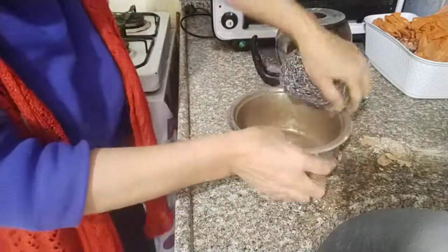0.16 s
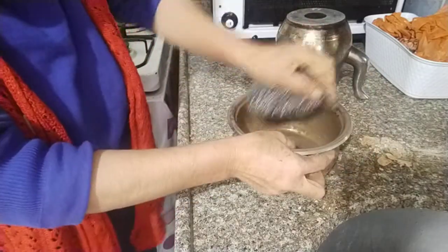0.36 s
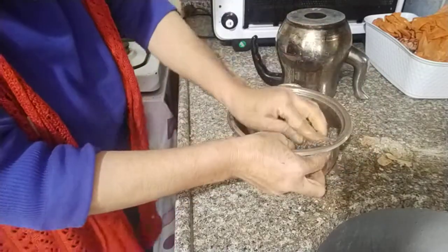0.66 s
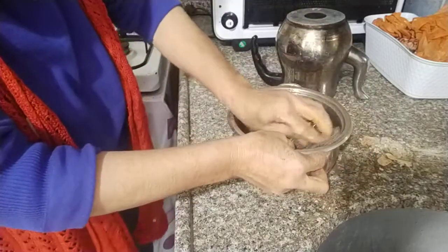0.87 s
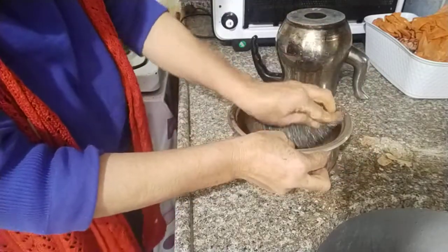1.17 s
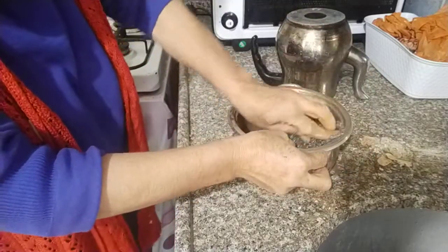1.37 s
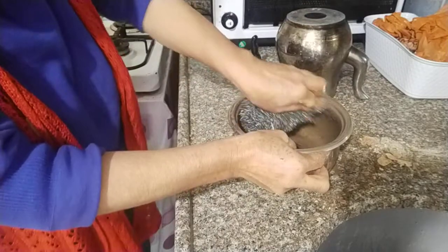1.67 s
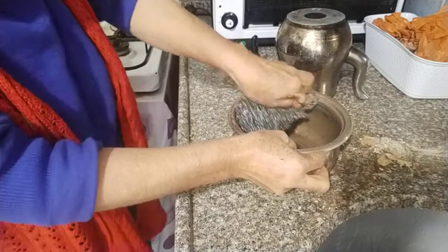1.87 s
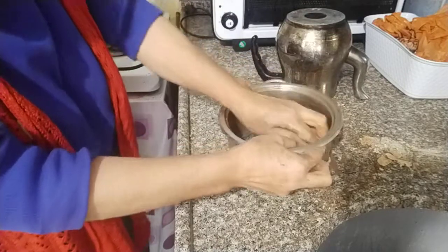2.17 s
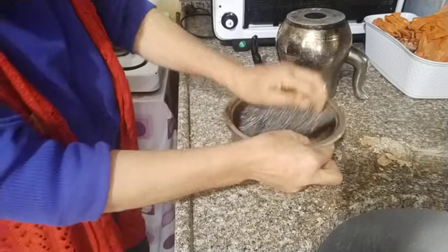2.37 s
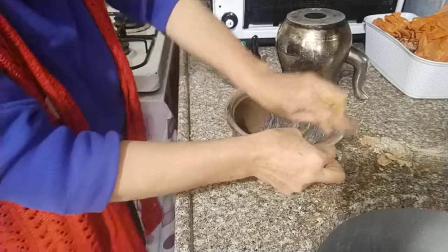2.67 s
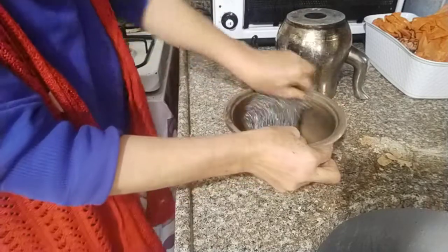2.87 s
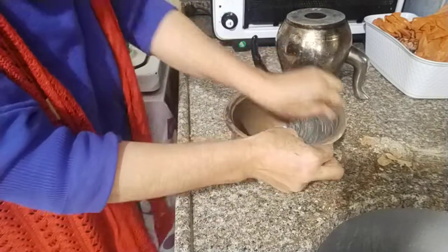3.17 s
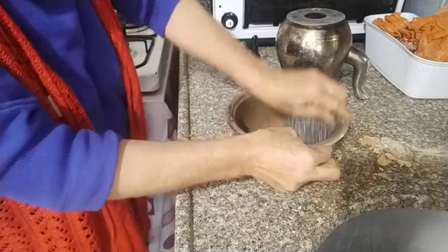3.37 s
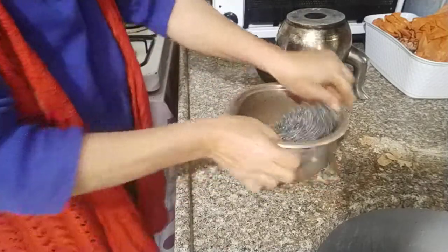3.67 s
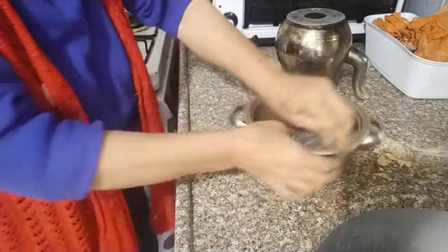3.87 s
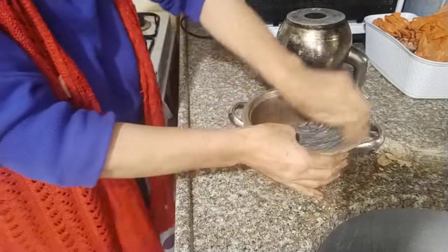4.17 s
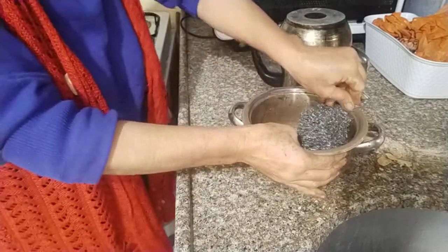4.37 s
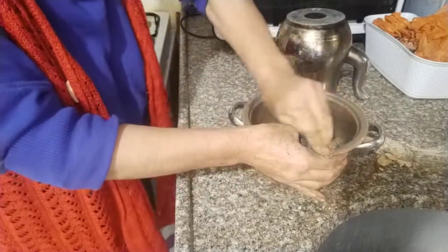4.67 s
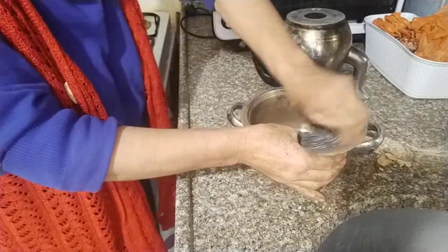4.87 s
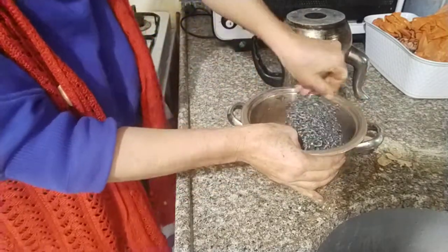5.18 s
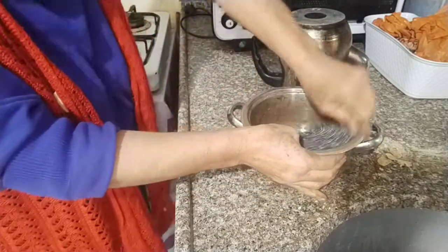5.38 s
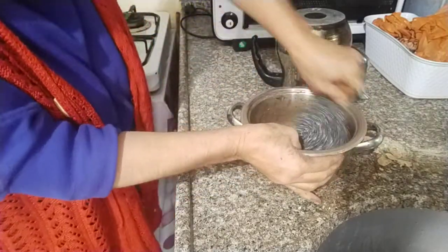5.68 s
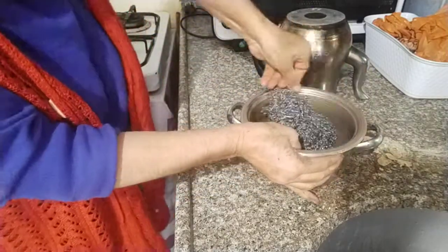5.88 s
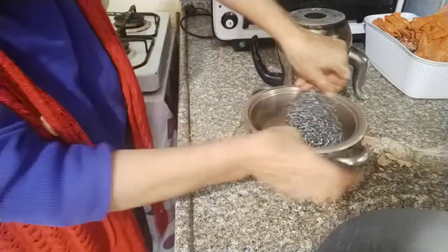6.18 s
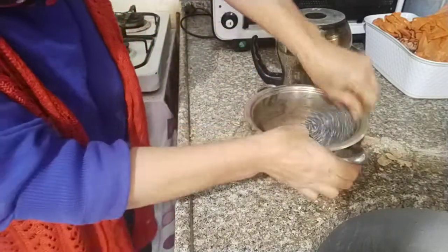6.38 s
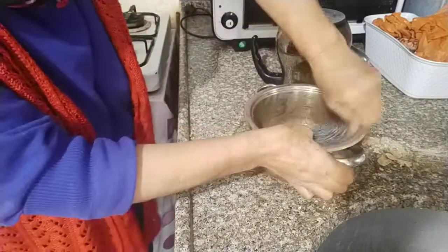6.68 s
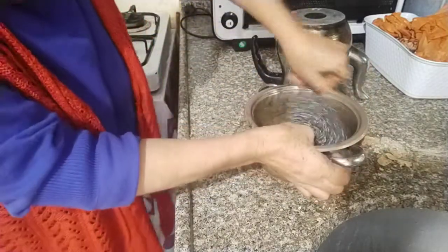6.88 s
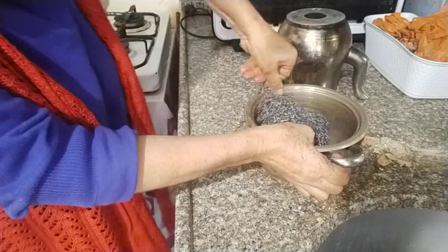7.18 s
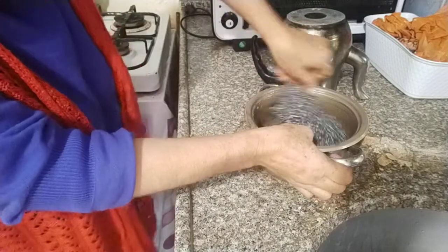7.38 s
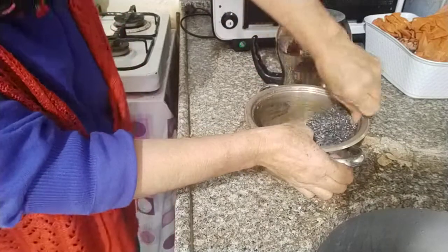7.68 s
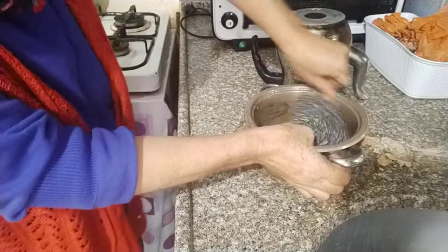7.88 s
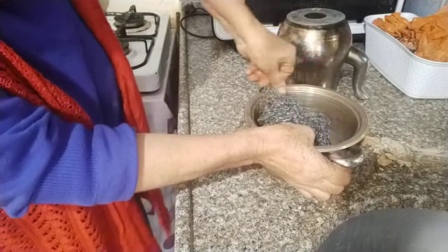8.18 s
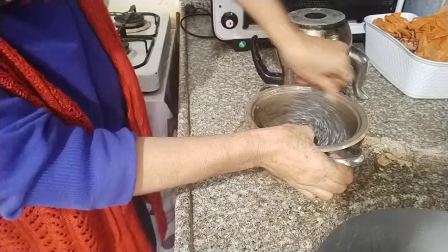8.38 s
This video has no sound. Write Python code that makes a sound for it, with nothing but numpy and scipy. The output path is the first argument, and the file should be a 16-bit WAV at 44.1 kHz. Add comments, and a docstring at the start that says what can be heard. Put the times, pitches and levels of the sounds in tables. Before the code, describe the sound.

A ball of steel wire scours a small steel pot in a home kitchen. Each stroke is a bright, scratchy hiss with a faint hollow rasp beneath, about two or three a second. The pot clanks and thuds irregularly on the stone counter, and snagged wire snaps free. Near the middle the pot is dragged round with a grinding, ringing scrape, then the scrubbing carries on. It sounds close, with a short echo.

```python
"""Small kitchen, granite counter: a steel-wire ball scours a small, ash-smeared steel pot.
Each stroke is a hiss of tiny wire slips that also drive the pot's wall, base and hollow.
Now and then the pot rocks and knocks on the stone, or is dragged and turned on its base.
Wires snag and snap free; friction briefly makes single modes sing. Short echo, faint room noise."""
import sys
import numpy as np
from scipy import signal
from scipy.io import wavfile
from scipy.ndimage import uniform_filter1d

SR = 44100
rng = np.random.default_rng(int(sys.argv[2]) if len(sys.argv) > 2 else 0)


def master_out(mix):
    """Clip the mix to full scale and print it as 16-bit PCM to the path in sys.argv[1]."""
    frames = np.transpose(np.atleast_2d(mix))
    ceiling = np.clip(frames, -1, 1)
    pcm = np.round(ceiling * 32767).astype(np.int16)
    wavfile.write(sys.argv[1], SR, pcm)


N = 376173
TIME = np.arange(N) / SR

# Table levels are relative, ahead of the layer gains.
# scourer strokes: t/s, length/s, rise/s, fall/s, hiss/dB, hiss slant start to end/dB,
# wall rasp/dB, low scrub/dB, base tone/Hz
STROKES = [(0.0, 0.34, 0.005, 0.09, -42.5, -4, -46.0, -49, 890),
           (0.247, 0.27, 0.068, 0.043, -63, 9, -66, -60, 855),
           (0.573, 0.14, 0.089, 0.07, -44.5, 5, -54, -56.5, 790),
           (0.718, 0.21, 0.029, 0.055, -51, 5, -58.5, -56.5, 885),
           (0.862, 0.33, 0.059, 0.085, -38.5, 12, -48, -51.5, 900.0),
           (1.154, 0.32, 0.15, 0.14, -38.5, 17, -50.5, -52.5, 980),
           (1.458, 0.42, 0.092, 0.09, -38, -0.5, -47, -53.5, 890),
           (1.87, 0.27, 0.13, 0.09, -39.5, -15, -48.5, -57, 834),
           (2.05, 0.29, 0.1, 0.077, -37.5, -22, -50.0, -45.5, 960),
           (2.26, 0.21, 0.056, 0.15, -49, -7, -53, -48.5, 680),
           (2.511, 0.18, 0.069, 0.11, -42, 6, -44.5, -46.5, 880),
           (2.606, 0.47, 0.092, 0.155, -36.5, 10, -42.5, -50, 835),
           (2.993, 0.38, 0.12, 0.085, -35.5, 4, -43.5, -48.5, 925),
           (3.363, 0.36, 0.077, 0.18, -36, 5, -44.0, -47, 870),
           (3.588, 0.5, 0.2, 0.12, -38.0, -6, -44.5, -42, 790),
           (4.06, 0.39, 0.17, 0.082, -35, -2, -45.5, -50.5, 950),
           (4.438, 0.38, 0.048, 0.12, -35.5, 2.5, -44.5, -52, 1360),
           (4.758, 0.48, 0.13, 0.054, -36, -3.5, -45, -48.5, 870),
           (5.218, 0.33, 0.047, 0.15, -35.0, 10, -46, -52, 750),
           (5.485, 0.52, 0.24, 0.094, -35, -9, -45, -50.5, 1440),
           (5.948, 0.31, 0.063, 0.089, -43.5, 12.0, -51.0, -49.5, 730.0),
           (6.238, 0.4, 0.095, 0.13, -34.5, 17.5, -43, -49, 830),
           (6.632, 0.62, 0.11, 0.1, -36.5, -13, -44, -52, 880),
           (7.18, 0.5, 0.15, 0.058, -37, 12.5, -46.5, -52.5, 965),
           (7.748, 0.48, 0.1, 0.045, -36.0, -6.5, -44.5, -53, 1270),
           (8.22, 0.398, 0.12, 0.11, -34, 12.5, -45, -53, 1360)]
# pot rocking, wire snagging: t/s, clack/dB, base tone/Hz, thud/dB, snap/dB
KNOCKS = [(0.028, -28.5, 864, -36.5, -31.5), (0.093, -32.5, 1650, -46, -33),
          (0.167, -30, 1030, -39.5, -27.5), (0.424, -45, 654, -46.5, -62), (0.696, -44, 1710, -71, -54),
          (1.001, -43, 824, -52.5, -46), (1.515, -69, 945, -55, -45), (2.08, -30.5, 613, -45, -60),
          (2.136, -47, 802, -49, -30.5), (2.156, -38, 820, -53, -26.5), (2.168, -52, 810, -53, -24),
          (2.343, -41, 800, -39.5, -40), (2.602, -33.5, 920, -54, -43), (2.831, -27, 1390, -47, -21.5),
          (2.845, -25.5, 1330, -45.5, -29), (3.013, -35, 955, -41.5, -45), (3.554, -25, 1070, -44, -27.5),
          (3.734, -27, 830, -48, -22), (3.791, -31, 960, -53, -33), (3.9, -29, 1620, -48, -30),
          (4.308, -36.5, 1020, -44.5, -31.5), (4.639, -39.5, 1405, -46.5, -37),
          (4.912, -33.5, 961, -65, -27), (4.927, -32.5, 1360, -60, -28), (5.088, -29, 975, -61, -29.5),
          (5.117, -29, 944, -58, -36), (5.27, -32, 1040, -60, -35), (5.489, -54, 910, -47.5, -40),
          (5.8, -32, 630, -49, -34), (6.248, -34.5, 710, -52.5, -35), (6.359, -37, 700, -45, -42),
          (6.6, -43, 880, -49.5, -44), (6.74, -35, 1200, -67, -28.5), (6.788, -26.5, 1100, -54, -27),
          (7.483, -42, 1090, -49, -44), (7.653, -33, 1050, -52, -25.5), (7.662, -31.5, 1440, -56, -34)]
# base dragged on stone: t/s, length/s, rise/s, fall/s, grind/dB, rumble/dB, wall ring/dB
DRAGS = [(0.0, 0.31, 0.005, 0.17, -42, -47.5, -42.5), (2.14, 0.11, 0.052, 0.046, -40, -62, -58),
         (2.274, 0.21, 0.032, 0.2, -50, -48, -48), (3.21, 0.15, 0.036, 0.06, -44, -70, -56),
         (3.514, 0.23, 0.037, 0.041, -37, -43, -48.5), (3.72, 0.14, 0.033, 0.085, -33.5, -31.5, -38),
         (3.823, 0.28, 0.055, 0.17, -38, -46, -40.5), (4.13, 0.078, 0.017, 0.05, -44, -51, -44),
         (5.953, 0.57, 0.17, 0.42, -39, -47, -45), (6.56, 0.18, 0.04, 0.065, -54, -53, -55),
         (7.212, 0.099, 0.03, 0.044, -49.5, -55, -62)]
# pot modes caught by friction: centre t/s, half length/s, f/Hz, level/dB
SINGS = [(0.022, 0.035, 1623, -35.5), (0.118, .03, 1647, -41.5), (0.697, 0.0072, 3380, -49),
         (1.641, 0.1, 936, -55.5), (2.341, 0.074, 3405, -56), (3.849, 0.057, 3436, -42),
         (3.909, 0.03, 3357, -36.5)]

# wire slips: f/Hz, level/dB
WIRE_SPECTRUM = [(2500, -45), (4500, -29), (5300, -26), (6600, -21.5), (7100, -10), (7550, -7),
                 (8100, -13.5), (9700, -15.5), (10400, -12), (11300, -13.5), (12800, -10.5), (13800, -5.5),
                 (14600, -4.5), (15500, 0)]
# wire snapping free: f/Hz, level/dB
SNAP_SPECTRUM = [(1200, -56), (2800, -11), (4600, -10), (6200, -21.5), (7600, 3.5), (9000, -3.5),
                 (12000, 1), (15500, 6)]
# steel on stone: f/Hz, level/dB
CLACK_SPECTRUM = [(70, -31), (170, -4), (340, -4), (460, -9), (620, -1), (800, 4), (950, 0), (1100, -0.5),
                  (1200, -2.5), (1400, -4), (1700, -11), (2100, -12.5), (4000, -25), (7000, -26)]
# counter under a bump: f/Hz, level/dB
THUD_SPECTRUM = [(35, -48), (65, -8), (88, -11), (115, -0.5), (180, -1), (260, -6.5), (340, -11),
                 (450, -12), (700, -29), (2000, -62)]
# quiet kitchen: f/Hz, level/dB
ROOM_SPECTRUM = [(20, 12.5), (50, -5), (120, -8), (170, -17), (400, -14), (700, -36), (1500, -2.5),
                 (3000, -19.5), (6000, -25), (15000, -16)]

# wall damped by hand and pad: f/Hz, width/Hz, level/dB
DAMPED_WALL_MODES = [(2167, 610, -3.5), (2858, 75, 9), (3440, 103, 5.5), (3582, 47, 6.5), (3810, 310, -2.5),
                     (4430, 29, -7.5)]
# wall ringing freely: f/Hz, width/Hz, level/dB
FREE_WALL_MODES = [(1637, 12, 0.5), (2520, 330, -10.5), (2831, 41, 0), (3380, 59, 1), (3420, 63, -2),
                   (5237, 88, -4.5), (5650, 160, -12.5), (6110, 210, -8), (7580, 30, -1.5), (8490, 120, -5),
                   (9200, 49, -10)]
# pot's hollow under the pad: f/Hz, width/Hz, level/dB
HOLLOW_MODES = [(169, 70, -3), (270, 100, -6), (420, 65, -6.5), (542, 30, 1.5), (657, 60, 3.5),
                (776, 102, 4), (936, 57, 0), (1098, 70, 2), (1318, 81, 4), (1757, 216, -2)]
# counter under the dragged base: f/Hz, width/Hz, level/dB
COUNTER_MODES = [(116, 14, 2), (164, 14, 5), (197, 18, 1.5), (225, 35, 0.5), (257.6, 8.4, 5),
                 (329, 16, 0.5)]
# kitchen echo decay: f/Hz, T60/s
ECHO_T60 = [(150, 0.41), (500, 0.62), (1500, 0.3), (4000, 0.41), (8000, 0.28), (15000, 0.23)]


def scourer():
    """Wire slips hiss, rasp on the wall and stir the pot's hollow and base."""
    hiss, rasp, scrub, base_hz = arm()
    wires = slips(rate_hz=7000, spread_db=1, clump_db=1.07, clump_s=0.008)
    ash = slips(rate_hz=3300, spread_db=1, clump_db=1.5, clump_s=0.014)
    ash = scrub * shifting_contact(ash, depth_db=1.7)
    return (amp(5.5) * through(hiss * shifting_contact(wires, depth_db=1.94), colour(WIRE_SPECTRUM))
            + amp(-3.5) * through(rasp * shifting_contact(wires, depth_db=2), modes(DAMPED_WALL_MODES))
            + amp(-5) * through(ash, modes(HOLLOW_MODES))
            + amp(-11.5) * resonate(ash, base_hz, width_hz=270))


def arm():
    """Strokes set hiss, rasp and scrub gains; the loaded base shifts tone as the pad travels."""
    rasp_db_per_db, scrub_db_per_db = 0.68, 0.33  # slopes against hiss
    power = np.zeros((3, N))
    power[0] = amp(-58) ** 2 * (TIME > 1)  # once pressed in, wire rustles between strokes
    for start_s, length_s, rise_s, fall_s, hiss_db, slant_db, rasp_db, scrub_db, _ in STROKES:
        push = slide(start_s, length_s, rise_s, fall_s, slant_db)
        power += np.square([amp(hiss_db) * push,
                            amp(rasp_db) * push ** rasp_db_per_db,
                            amp(scrub_db) * push ** scrub_db_per_db])
    start_s, length_s, *_, tone_hz = np.transpose(STROKES)
    drift = np.exp(0.07 * wander(step_s=0.06))
    base_hz = np.interp(TIME, start_s + length_s / 2, tone_hz) * drift
    uneven_hand = amp(1.5 * wander(step_s=0.021))
    hiss, rasp, scrub = np.sqrt(power) * uneven_hand
    return hiss, rasp, scrub, base_hz


def slide(start_s, length_s, rise_s, fall_s, slant_db=0):
    """Gain of a slide that speeds up, runs on and stops."""
    t = TIME - start_s
    speed = np.clip(t / rise_s, 0, 1) * np.clip((length_s - t) / fall_s, 0, 1)
    progress = np.clip(t / length_s, 0, 1)
    return speed ** 1.414 * amp(slant_db * (progress - 0.5))


def slips(rate_hz, spread_db, clump_db, clump_s):
    """Uneven stick-slip kicks in clumps; unit power."""
    size = amp(spread_db * np.clip(rng.standard_normal(N), -2.5, 2.5) + clump_db * wander(clump_s))
    kicks = size * rng.choice([-1, 1], N) * (rng.random(N) < rate_hz / SR)
    return kicks / (kicks.std() + 1e-12)


def shifting_contact(force, depth_db, frame_samples=512):
    """Changing contact points shift the spectrum in patches; unit power."""
    spectra = signal.stft(force, nperseg=frame_samples)[2]
    patches = uniform_filter1d(rng.standard_normal(spectra.shape), size=3, axis=0)
    patches = uniform_filter1d(patches, size=6, axis=1)
    gain = amp(depth_db * patches / patches.std())
    out = signal.istft(spectra * gain, nperseg=frame_samples)[1][:N]
    return out / out.std()


def knocks():
    """The rocking pot clanks at a grip-set tone, thuds the counter and rings; snagged wire snaps."""
    thud, clack, snap, ring, clank = np.zeros((5, N))
    for start_s, clack_db, base_hz, thud_db, snap_db in KNOCKS:
        blow = contacts(decay_s=0.0079, first=0.43)
        add(clack, start_s, amp(clack_db) * blow)
        add(clank, start_s, amp(clack_db) * resonate(blow, base_hz, width_hz=60))
        add(ring, start_s, amp((clack_db + snap_db) / 2) * blow)
        add(thud, start_s, amp(thud_db) * contacts(decay_s=0.014, first=0.61))  # stone settles slowly
        release = contacts(decay_s=0.0083, first=0.084, rise_s=0.0019)  # wire lets go loop by loop
        add(snap, start_s, amp(snap_db) * release)
    return (amp(27.5) * through(thud, colour(THUD_SPECTRUM))
            + amp(17) * (through(clack, colour(CLACK_SPECTRUM)) + clank)
            + amp(26) * through(snap, colour(SNAP_SPECTRUM))
            + through(amp(17) * ring + amp(8.5) * snap, modes(FREE_WALL_MODES)))


def contacts(decay_s, first, rise_s=0.0007):
    """One contact of weight `first`, then dying chatter; unit energy."""
    t = TIME[:SR // 4]
    envelope = np.exp(-t / decay_s) * (1 - np.exp(-t / rise_s))
    chatter = rng.standard_normal(len(t)) * (rng.random(len(t)) < 0.2) * envelope
    force = chatter / np.linalg.norm(chatter)
    force[0] += first
    return force / np.linalg.norm(force)


def drags():
    """The base judders over the stone's grain; the counter rumbles, the wall rings."""
    grind, rumble, ring = sum(amp(row[4:])[:, None] * slide(*row[:4]) for row in DRAGS)
    high_pass = signal.butter(4, 95, "highpass", fs=SR, output="sos")
    counter = signal.sosfilt(high_pass, modes(COUNTER_MODES))  # the rumble carries no deep bass below about 95 Hz
    judder = slips(rate_hz=1400, spread_db=6, clump_db=1.5, clump_s=0.0099)
    wall_force = ring * shifting_contact(judder, depth_db=3.5, frame_samples=1024)
    return (amp(-7.5) * through(grind * judder, colour(CLACK_SPECTRUM))
            + amp(-11) * resonate(grind * judder, hz=790, width_hz=120)
            + amp(-2.5) * through(rumble * judder, counter)
            + amp(-2.5) * through(wall_force, modes(FREE_WALL_MODES)))


def singing():
    """Friction feeds one narrow mode, which swells and fades."""
    out, t = np.zeros(N), TIME[:SR // 2]
    for centre_s, half_s, hz, db in SINGS:
        start_s = max(centre_s - 2 * half_s, 0)
        envelope = np.exp(-((start_s + t - centre_s) / half_s) ** 2)
        rubbing = rng.standard_normal(len(t)) * envelope
        add(out, start_s, amp(db) * resonate(rubbing, hz, width_hz=37))
    return out


def kitchen_echo(sound, cycle_s=0.7, gap_s=0.004):
    """Tiles and cupboards reflect; moving arms vary the paths, as four crossfaded tails."""
    out, t = np.zeros(N), TIME[:SR // 2]
    for k in range(4):
        taps = rng.standard_normal(len(t)) * (rng.random(len(t)) < 0.1) * (t > gap_s)
        hz, age_s, spectra = signal.stft(taps, SR, nperseg=256)
        decay = amp(-60 * age_s / lookup(ECHO_T60, hz)[:, None])
        tail = signal.istft(spectra * decay, SR, nperseg=256)[1]
        share = np.maximum(np.cos(2 * np.pi * (TIME / cycle_s - k / 4)), 0)
        out += through(sound * share, tail)
    return out


def room_noise():
    """Faint, steady coloured noise."""
    return amp(-61.5) * through(rng.standard_normal(N), colour(ROOM_SPECTRUM))


def colour(spectrum):
    """Minimum-phase impulse response of a spectrum table."""
    hz = np.fft.rfftfreq(8192, 1 / SR)
    log_gain = np.log(amp(lookup(spectrum, hz)))
    mirrored = np.concatenate([log_gain, log_gain[-2:0:-1]])
    response = np.exp(np.conj(signal.hilbert(mirrored)))
    return np.fft.ifft(response).real[:len(hz)]


def modes(rows):
    """Impulse response of damped modes, alternating in sign."""
    t = TIME[:SR // 5]
    return sum((-1) ** k * amp(db) * width_hz * np.exp(-np.pi * width_hz * t) * np.sin(2 * np.pi * hz * t)
               for k, (hz, width_hz, db) in enumerate(rows))


def resonate(force, hz, width_hz):
    """Resonance at a steady or moving pitch; unit power gain for white noise."""
    carrier = np.exp(2j * np.pi * np.cumsum(hz * np.ones(len(force))) / SR)
    pole = np.exp(-np.pi * width_hz / SR)
    gain = np.sqrt(2 * (1 - pole ** 2))
    return (carrier * signal.lfilter([gain], [1, -pole], force / carrier)).imag


def through(force, body):
    """Force convolved with a body's response, scaled to unit energy."""
    return signal.oaconvolve(force, body / np.linalg.norm(body))[:N]


def wander(step_s):
    """Random drift between unit-variance knots."""
    knots = rng.standard_normal(N // 8)
    return np.interp(TIME / step_s, np.arange(len(knots)), knots)


def lookup(table, hz):
    """Interpolate over log frequency."""
    knots_hz, values = np.transpose(table)
    return np.interp(np.log(hz + 1), np.log(knots_hz), values)


def add(mix, start_s, sound):
    """Mix in place."""
    part = mix[round(start_s * SR):][:len(sound)]
    part += sound[:len(part)]


def amp(db):
    """dB to gain."""
    return 10 ** (np.asarray(db) / 20)


def scene():
    """Scourer, pot and kitchen; dual mono."""
    direct = scourer() + drags() + knocks() + singing()
    mono = direct + room_noise() + kitchen_echo(amp(-7) * direct)
    return np.array([mono, mono])


def record(dry, cutoff_hz=15760):
    """Steep low-pass."""
    low_pass = signal.firwin(1023, cutoff_hz, window=("kaiser", 8), fs=SR)
    return signal.oaconvolve(dry, low_pass[None], "same")


dry = scene()
out = record(dry)
master_out(out)
```